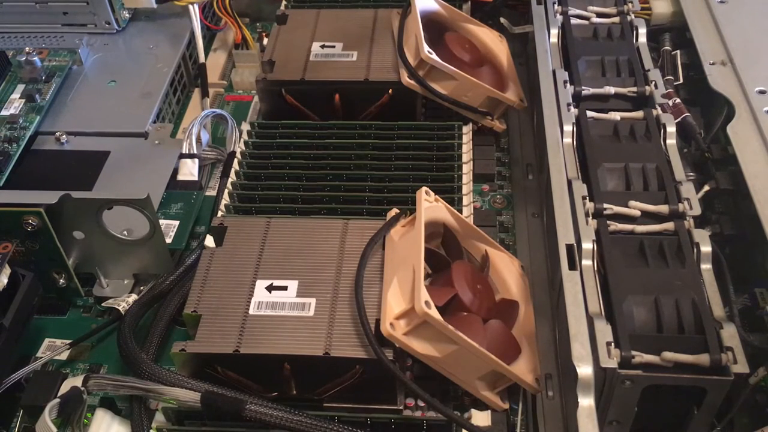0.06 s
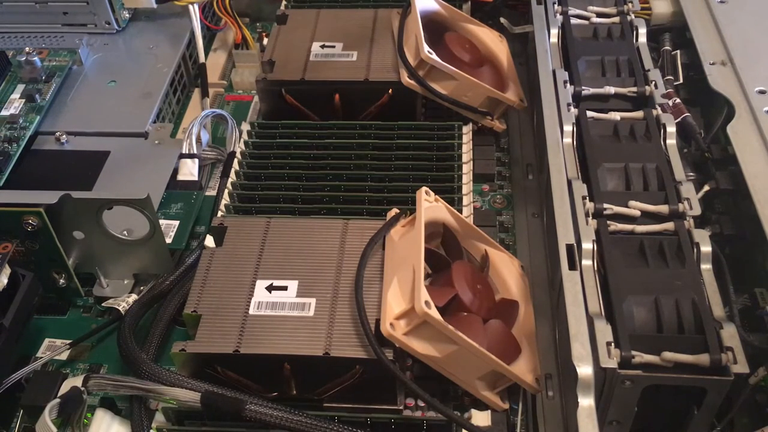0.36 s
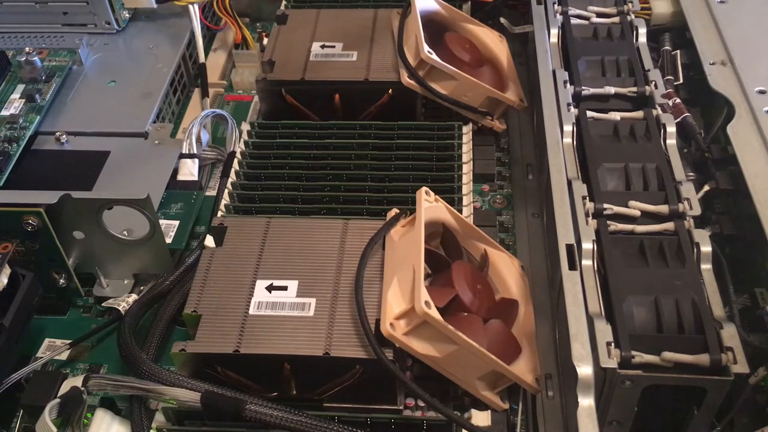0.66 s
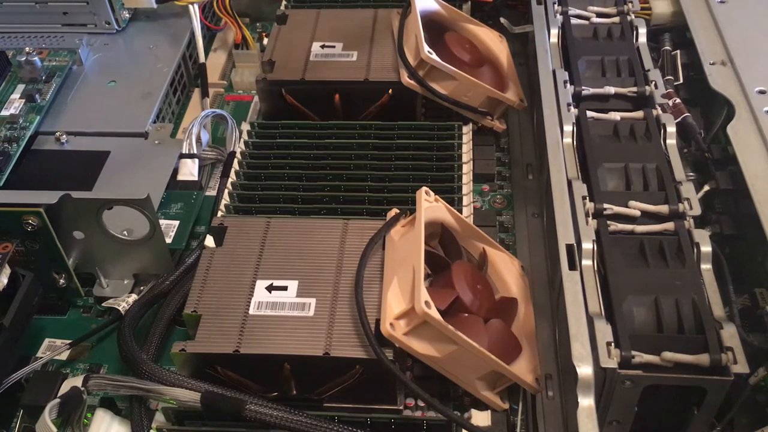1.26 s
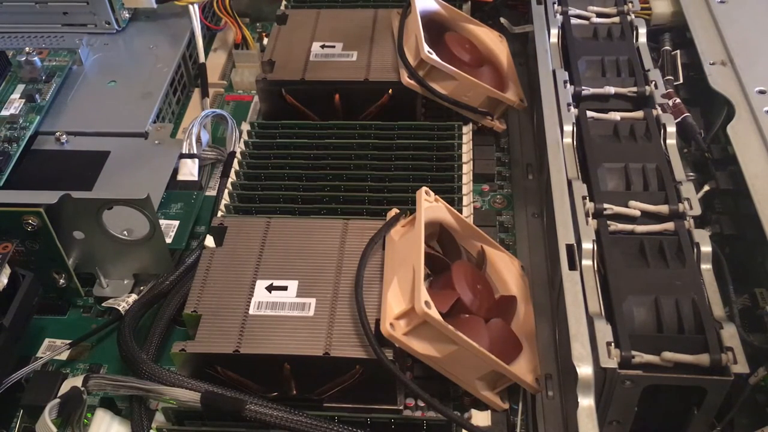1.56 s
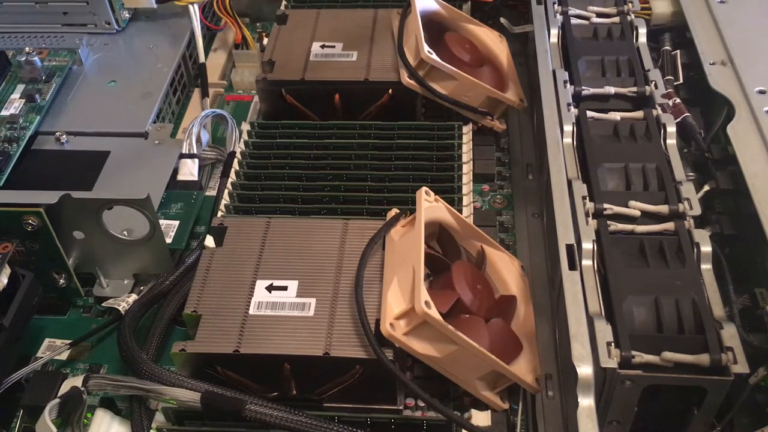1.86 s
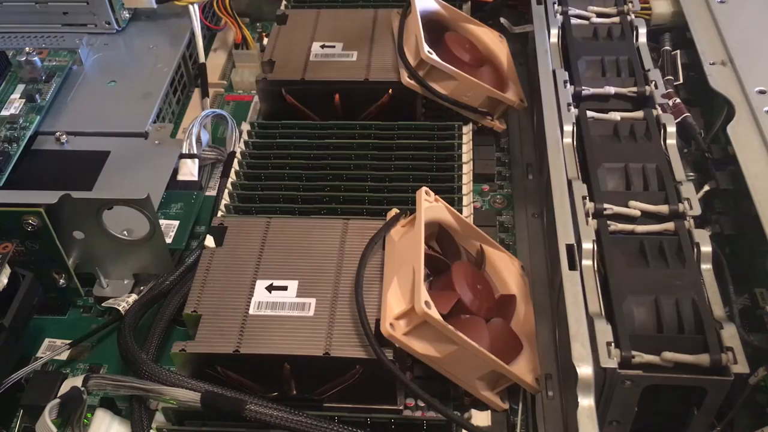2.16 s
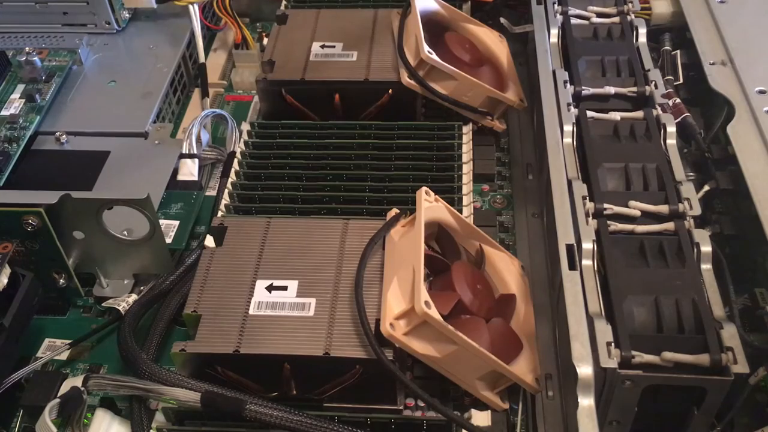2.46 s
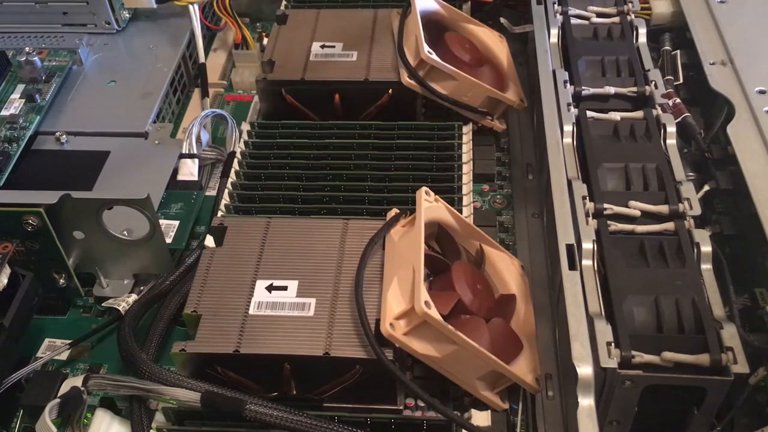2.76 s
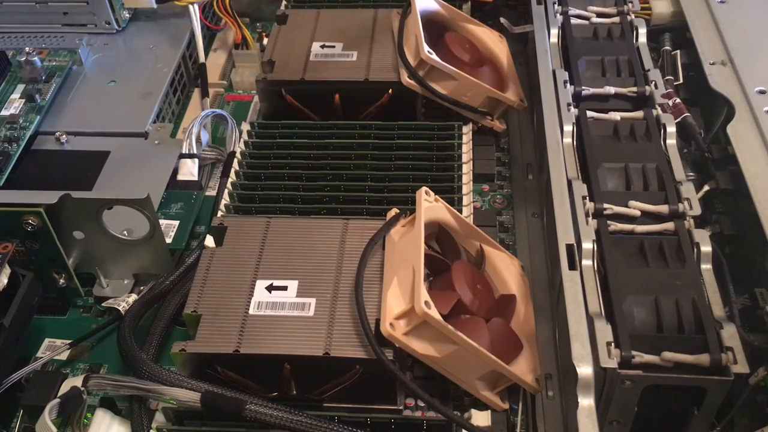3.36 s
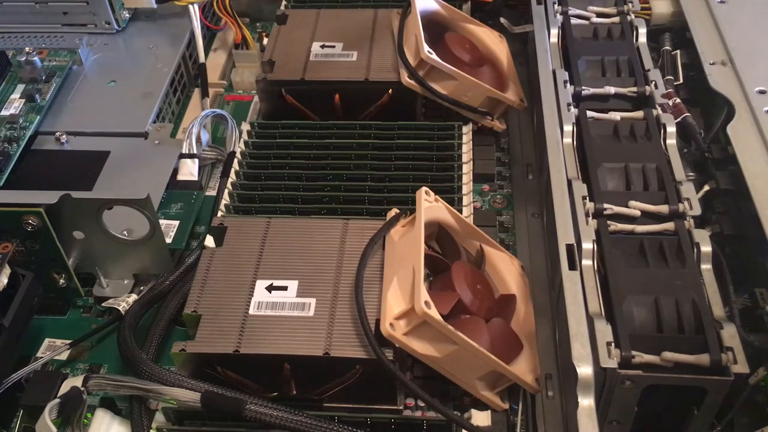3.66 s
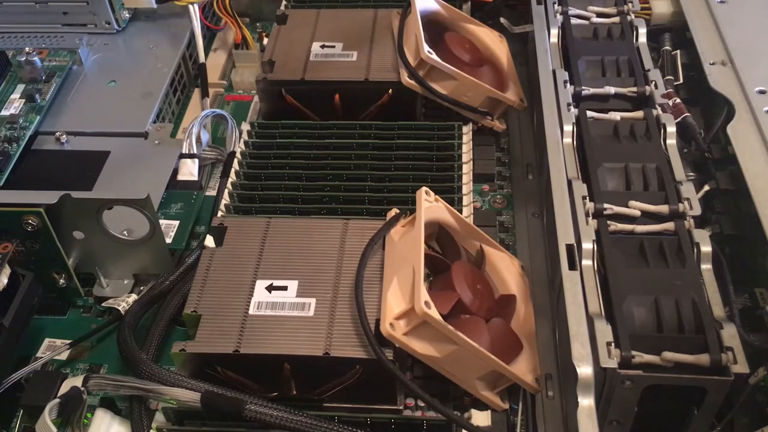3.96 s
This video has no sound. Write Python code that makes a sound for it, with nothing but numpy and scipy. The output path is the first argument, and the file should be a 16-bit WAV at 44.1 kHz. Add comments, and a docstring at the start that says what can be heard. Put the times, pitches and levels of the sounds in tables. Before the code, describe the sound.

Cooling fans in an open server blow with a loud rush of air and a wavering whine. They rise in pitch and loudness, then settle at a steady speed, heard close up indoors.

```python
"""Air rushes through the heat sinks and case of an open server as its row of small seven-bladed fans
spins up, overshoots a little and settles. The turbulence radiates broadband noise, louder and brighter
with speed. The blades whine at harmonics of the blade-passing frequency, which swell and fade as the
fans drift in and out of step, and rotor unbalance adds a faint hum."""
import sys
import numpy as np
from scipy import signal
from scipy.fft import rfft, irfft
from scipy.io import wavfile
from scipy.ndimage import uniform_filter1d

SR = 44100
rng = np.random.default_rng(int(sys.argv[2]) if len(sys.argv) > 2 else 0)


def generate_wav(sig):
    """Save sig (samples, or channels by samples) to the path in sys.argv[1] as 16-bit PCM at SR."""
    pcm = np.round(np.clip(np.atleast_2d(sig).T, -1, 1) * 32767).astype(np.int16)
    wavfile.write(sys.argv[1], SR, pcm)


N = 176400
TIME = np.arange(N) / SR
BLADES, FULL_SPEED_HZ = 7, 172.6  # full speed is the reference for the growth of rush and overtones


def air_rush(speed):
    """Turbulence radiates broadband noise, filtered by case and room; the treble grows most with speed."""
    # Spectral density at full speed, before case and room colour it: f/Hz, level/dB (per Hz)
    spectrum = [(20, -96), (32, -92), (55, -86.5), (85, -89.5), (125, -85.5), (195, -83.5), (250, -79.5),
                (335, -91), (420, -87), (600, -79), (760, -81), (1000, -75), (1400, -76), (1900, -74),
                (2500, -75.5), (3200, -76), (3800, -75), (4550, -75), (4950, -78.5), (5600, -74.5),
                (6300, -79), (7000, -80.5), (7800, -81), (8700, -79), (9900, -83.5), (10400, -85.5),
                (11500, -86.5), (13000, -88), (15700, -90.5)]
    # Resonances and dips of the case and fins: f/Hz, width/Hz, gain/dB
    resonances = [(54, 10, 5), (462, 12, 3.5), (707, 45, 2.5), (720, 28, -4.5), (865, 40, -0.5),
                  (1082, 61, 2.5), (1460, 67, -2.5), (1590, 140, 4.5), (1830, 36, -1.5), (1983, 35, 3),
                  (2146, 50, 4.5), (2250, 80, -4), (2670, 87, -0.5), (3040, 94, 4.5), (3340, 103, 4.5),
                  (4000, 90, -1), (4295, 180, 6), (4930, 200, -1), (5480, 176, 5), (5770, 100, 2),
                  (6520, 170, 4), (7200, 240, 6.5)]
    # Growth of each band with speed: centre f/Hz, gain/dB per doubling of speed
    band_growth = [(60, 2), (120, -2.5), (250, 13), (700, 7.5), (1600, 10.5), (3000, 11.5), (5500, 13),
                   (8500, 18.5), (13000, 19)]
    ripple_db, ripple_spacing_hz = 1.62, 22.06  # room reflections ripple the spectrum
    flicker_db, flicker_hz = 0.32, 20  # the flow is uneven in each band
    surge_db, surge_hz = 0.32, 2.7  # and surges slightly as a whole
    hz = np.maximum(np.arange(N // 2 + 1) * SR / N, 1)
    white = rfft(rng.standard_normal(N)) * np.sqrt(SR / 2)  # unit power per Hz
    ripple = np.interp(hz / ripple_spacing_hz, np.arange(N), rng.standard_normal(N))
    case_db = sum(resonance_db(hz, centre, width, db) for centre, width, db in resonances)
    air = white * from_db(at_hz(spectrum, hz) + case_db + ripple_db * ripple)
    centres, growths = np.transpose(band_growth)
    octaves = np.log2(speed / FULL_SPEED_HZ)
    rush = np.zeros(N)
    for selector, growth in zip(np.eye(len(centres)), growths):
        triangle = np.interp(np.log(hz), np.log(centres), selector)  # overlapping bands that sum to 1
        rush += irfft(air * triangle, N) * from_db(growth * octaves + flicker_db * drift(flicker_hz))
    return rush * from_db(surge_db * drift(surge_hz))


def blade_whine(speed):
    """Blades passing the struts make periodic pressure pulses: harmonics of the blade-passing frequency."""
    # Envelopes of harmonics 1 to 5, as the fans drift in and out of step: t/s, level/dB
    first = [(0,-66),(.1,-51.5),(.25,-60),(.34,-66),(.46,-60),(.52,-48.5),(.7,-49.5),(.76,-55),(.84,-46.5),(1,-45),(1.18,-43),(1.24,-48.5),(1.3,-36.5),(1.36,-55),(1.42,-39),(1.48,-48),(1.54,-36.5),(1.6,-49),(1.66,-38.5),(1.84,-43),(1.88,-51.5),(2,-46),(2.04,-60),(2.16,-48),(2.26,-54),(2.32,-41.5),(2.39,-64),(2.56,-44.5),(2.72,-53),(2.84,-49),(3.1,-53.5),(3.22,-36),(3.36,-42.5),(3.44,-40),(3.62,-42.5),(3.66,-53),(3.72,-40),(4,-37.2)]
    second = [(0.0, -42), (0.22, -42), (0.44, -48.5), (0.66, -46), (0.7, -57), (0.88, -38), (0.94, -53.8),
              (1.02, -40.5), (1.12, -56), (1.22, -42.4), (1.36, -48), (1.4, -41.5), (1.82, -42),
              (1.94, -37.5), (1.98, -56), (2.02, -38), (2.1, -35), (2.24, -48.4), (2.3, -40.6), (2.48, -46),
              (2.7, -37), (2.78, -39), (2.84, -56), (2.96, -39), (3.1, -48), (3.28, -39.5), (3.4, -44.5),
              (4.0, -41)]
    third = [(0,-67),(.3,-54),(.36,-50),(.62,-51),(.76,-42),(.82,-49.5),(.92,-41.5),(.98,-48),(1.12,-38.5),(1.18,-46),(1.3,-39),(1.34,-48),(1.54,-40),(1.62,-39),(1.68,-53),(1.74,-43.5),(1.84,-47),(1.94,-40.5),(2.3,-36.5),(2.48,-38.5),(2.6,-37),(2.68,-43.5),(2.78,-37.5),(3,-44),(3.05,-48),(4,-42)]
    fourth = [(0,-62),(.4,-54),(.65,-55),(1.15,-50),(1.38,-41),(1.5,-43),(1.6,-48),(1.72,-42.5),(1.92,-57),(2.14,-49),(2.6,-49),(2.8,-58),(3.28,-46.5),(3.55,-51),(3.65,-47.5),(4,-51.5)]
    fifth = [(0,-69),(.38,-53),(.55,-56),(.85,-55),(1.2,-58),(1.52,-44),(1.68,-52),(1.8,-51),(1.9,-57),(2.45,-53),(3.1,-53),(3.35,-48),(3.9,-43.5),(4,-47)]
    # Faint overtones at full speed, before the fin resonance: harmonic number, level/dB
    overtones = [(6, -55.5), (7, -70)]
    overtone_db_per_octave = 18
    passes = BLADES * np.cumsum(speed) / SR
    acceleration = np.abs(np.gradient(speed))
    flutter = 0.18 + 0.39 * (acceleration / acceleration.max()) ** 2  # less steady while speed changes
    low = sum(from_db(in_time(envelope)) * fluttering_partial(k * passes, flutter)
              for k, envelope in enumerate([first, second, third, fourth, fifth], 1))
    high = sum(from_db(db) * fin_gain(k * BLADES * speed) * fluttering_partial(k * passes, flutter=1)
               for k, db in overtones)
    return low + high * from_db(overtone_db_per_octave * np.log2(speed / FULL_SPEED_HZ))


def fluttering_partial(cycles, flutter):
    """Turbulent inflow modulates a tone of rms 1 in amplitude and phase, broadening its spectral line."""
    flutter_hz, skirt_hz, skirt_depth = 14, 70.5, 0.12
    waver = flutter * (drift(flutter_hz) + 1j * drift(flutter_hz))
    skirt = skirt_depth * (drift(skirt_hz) + 1j * drift(skirt_hz))  # noisy sidebands
    carrier = np.exp(2j * np.pi * (cycles + rng.random()))
    tone = (np.sqrt(2) + waver + skirt) * carrier
    return tone.real / np.sqrt(1 + flutter ** 2 + skirt_depth ** 2)


def fin_gain(hz):
    """Resonance: the fins amplify an overtone that sweeps through their natural frequency."""
    return from_db(resonance_db(hz, centre_hz=5540, width_hz=260, peak_db=15))


def rotor_hum(speed):
    """Forced vibration: unbalanced rotors shake the case once a turn."""
    # Envelope of the hum (rms): t/s, level/dB
    envelope = [(0, -74), (1.3, -69), (1.62, -66.5), (1.8, -54.5), (2.02, -64.5), (2.2, -62), (2.55, -57),
                (2.85, -74), (3.05, -60), (3.25, -57.5), (3.7, -56), (4, -56.5)]
    turns = np.cumsum(speed) / SR
    return from_db(in_time(envelope)) * np.sqrt(2) * np.sin(2 * np.pi * turns)


def rotor_speed():
    """Rotation frequency in Hz; inertia rounds the corners of its curve."""
    # Spin-up, overshoot and settling of the rotors: t/s, f/Hz
    spin_up = [(0, 108.25), (0.3, 115.3), (0.6, 124.3), (0.85, 131.53), (1.1, 139.27), (1.25, 145.8),
               (1.55, 158.6), (1.7, 165.08), (1.85, 169), (2, 172.45), (2.15, 174.37), (2.3, 173),
               (2.5, 174.6), (2.75, 172.3), (3.2, 168.32), (3.45, 166), (3.7, 166.18), (4, 165.77)]
    return uniform_filter1d(in_time(spin_up), size=4001, mode="nearest")


def resonance_db(hz, centre_hz, width_hz, peak_db):
    """Gain in dB of a resonance with a Lorentzian shape."""
    return peak_db / (1 + (2 * (hz - centre_hz) / width_hz) ** 2)


def drift(rate_hz):
    """Random fluctuation: low-passed noise of standard deviation 1."""
    hz = np.arange(N // 2 + 1) * SR / N
    slow = irfft(rfft(rng.standard_normal(N)) / (1 + (hz / rate_hz) ** 2), N)
    return slow / slow.std()


def from_db(db):
    """Amplitude ratio of a level in dB."""
    return 10 ** (np.asarray(db) / 20)


def in_time(rows):
    """Linear interpolation of a curve in time."""
    return np.interp(TIME, *np.transpose(rows))


def at_hz(points, hz):
    """Linear interpolation of a spectrum in log frequency."""
    centres, values = np.transpose(points)
    return np.interp(np.log(hz), np.log(centres), values)


def scene():
    """Superposition of rush, whine and hum just above the open case, alike in both channels."""
    speed = rotor_speed()
    fans = air_rush(speed) + blade_whine(speed) + rotor_hum(speed)
    return np.array([fans, fans])


def record(dry):
    """Band limiting: a steep zero-phase low-pass filter removes the highest treble."""
    cutoff_hz = 15800
    low_pass = signal.ellip(12, rp=0.05, rs=60, Wn=cutoff_hz, fs=SR, output="sos")
    return signal.sosfiltfilt(low_pass, dry)


dry = scene()
out = record(dry)
generate_wav(out)
```